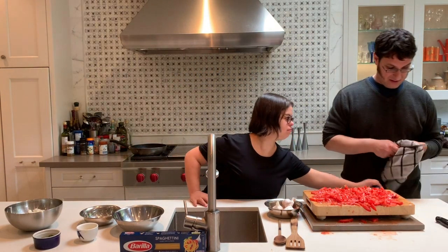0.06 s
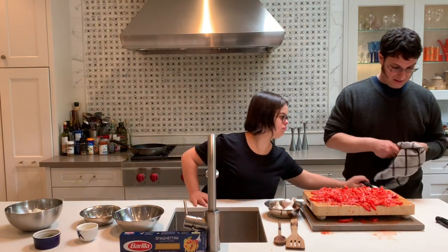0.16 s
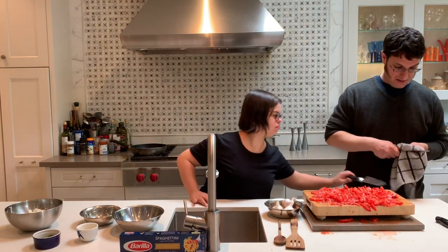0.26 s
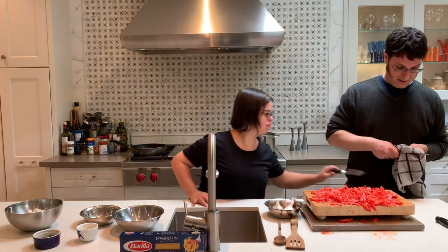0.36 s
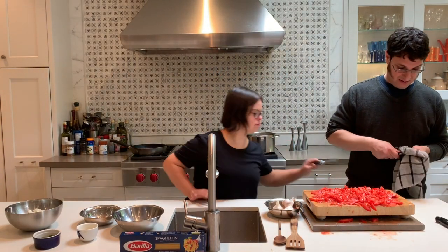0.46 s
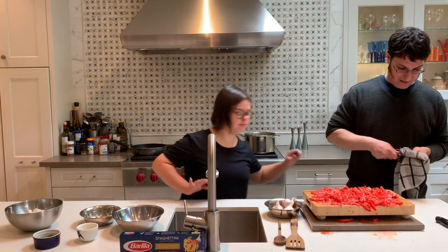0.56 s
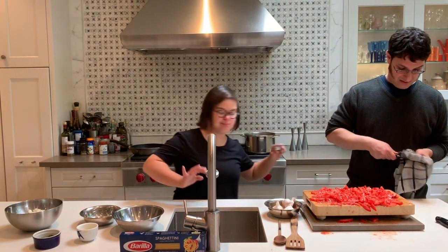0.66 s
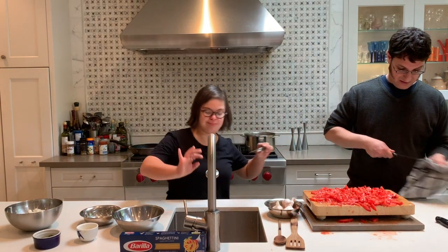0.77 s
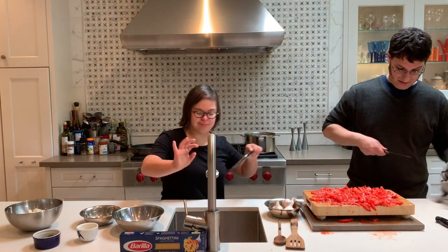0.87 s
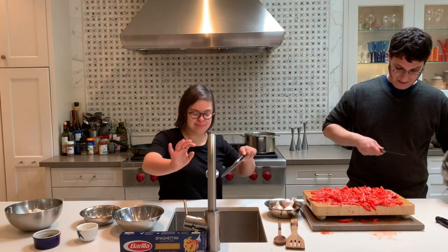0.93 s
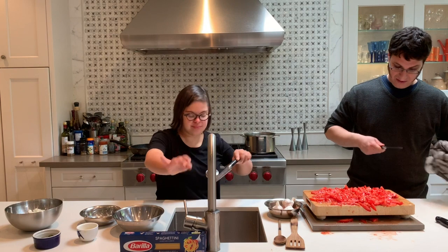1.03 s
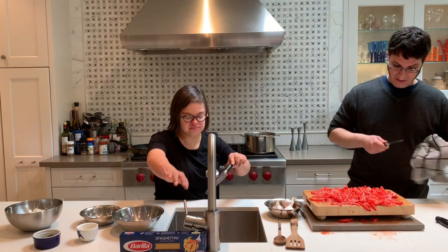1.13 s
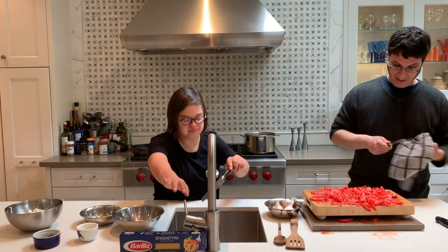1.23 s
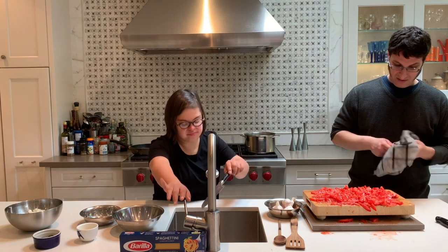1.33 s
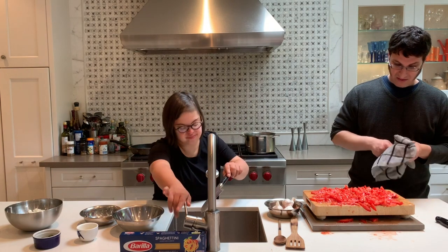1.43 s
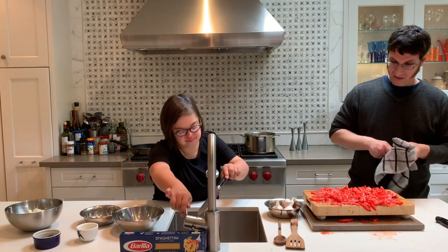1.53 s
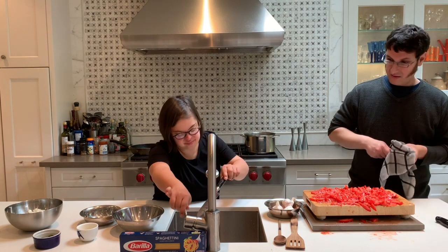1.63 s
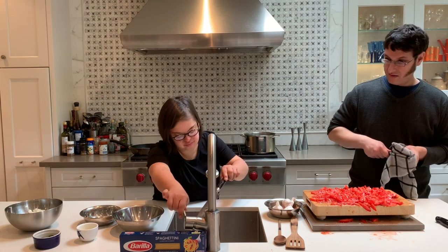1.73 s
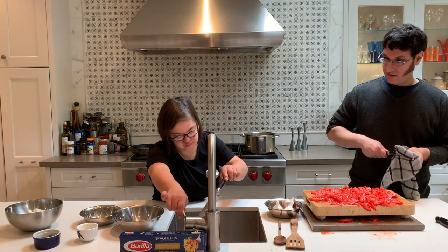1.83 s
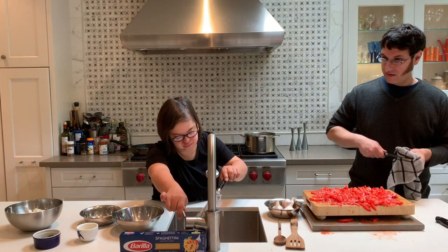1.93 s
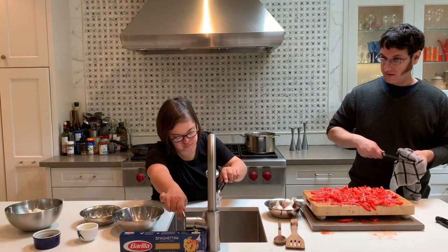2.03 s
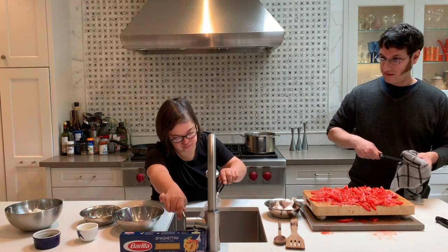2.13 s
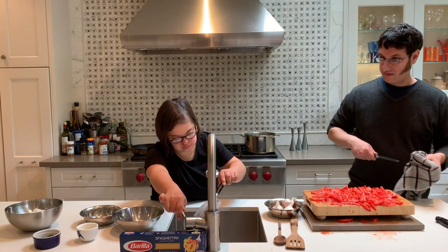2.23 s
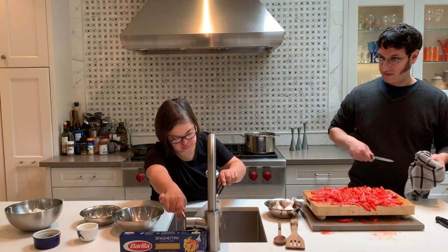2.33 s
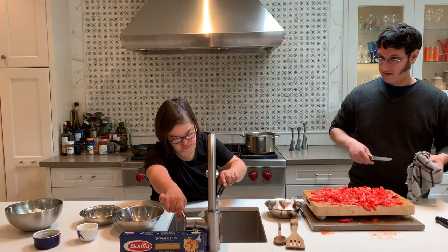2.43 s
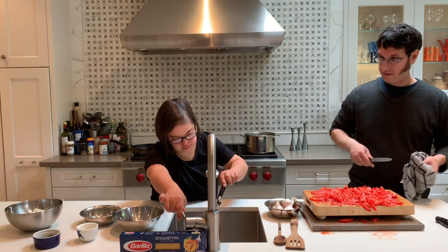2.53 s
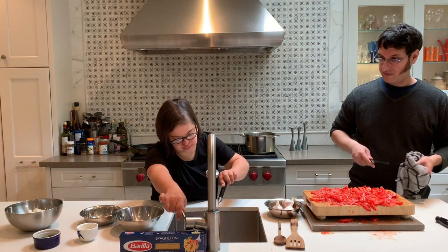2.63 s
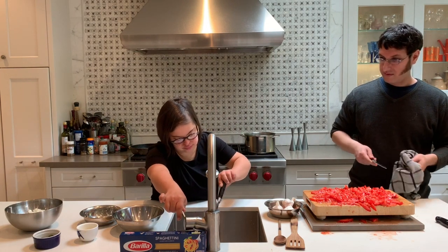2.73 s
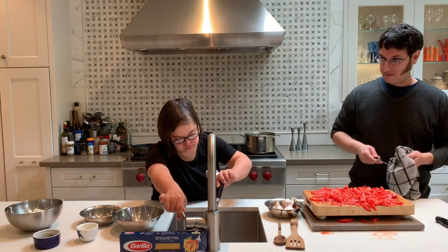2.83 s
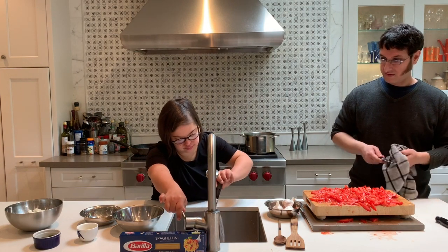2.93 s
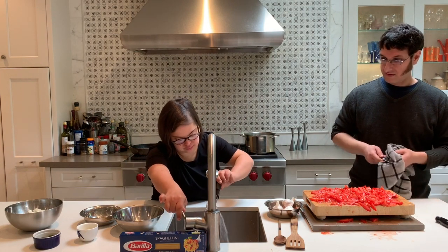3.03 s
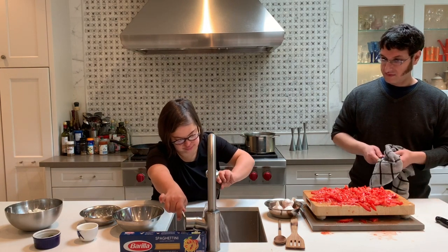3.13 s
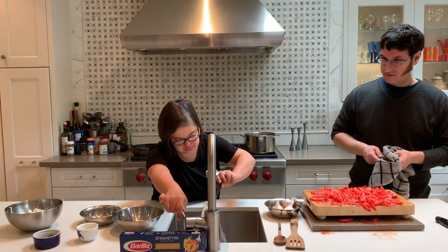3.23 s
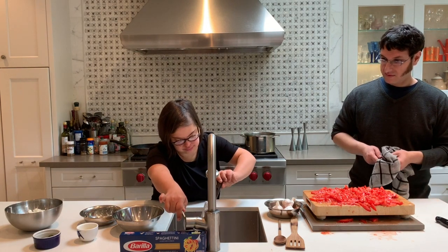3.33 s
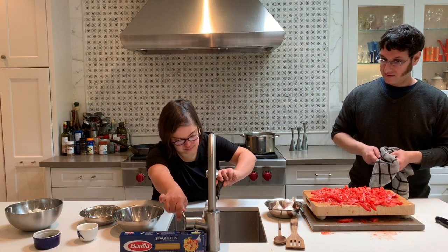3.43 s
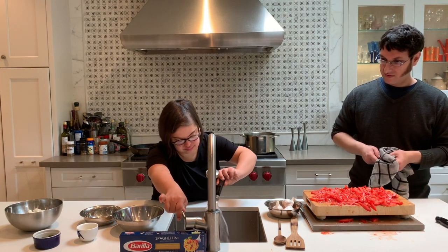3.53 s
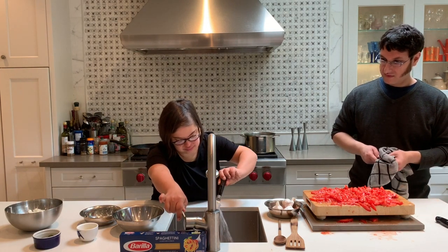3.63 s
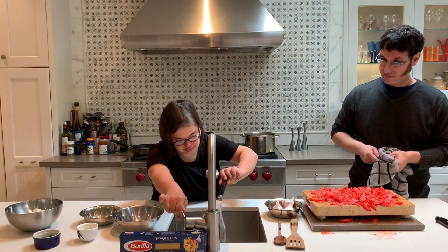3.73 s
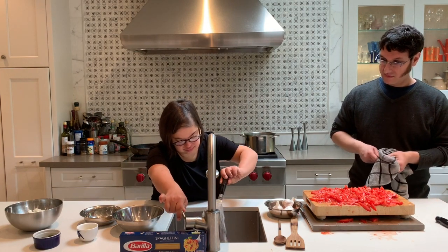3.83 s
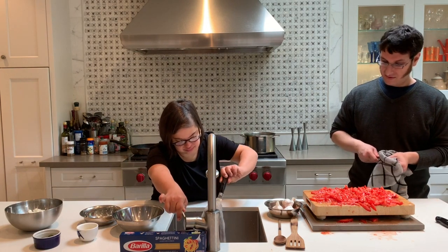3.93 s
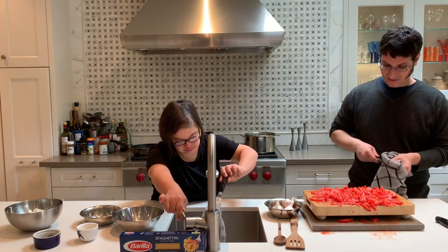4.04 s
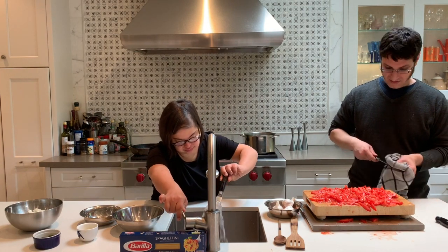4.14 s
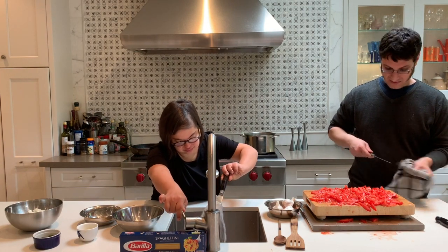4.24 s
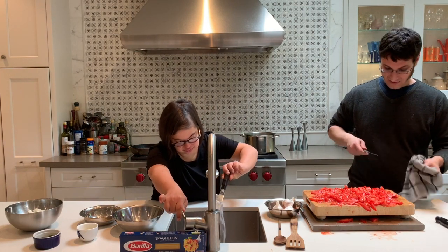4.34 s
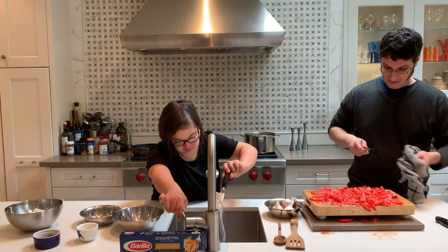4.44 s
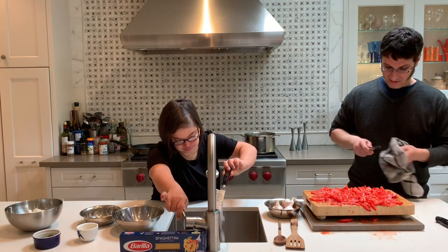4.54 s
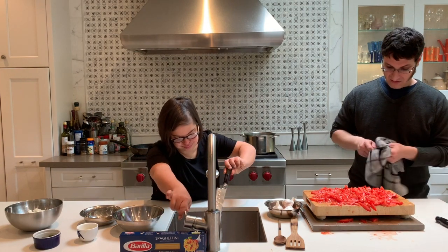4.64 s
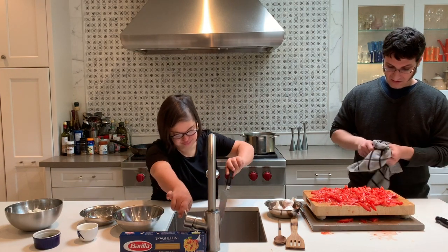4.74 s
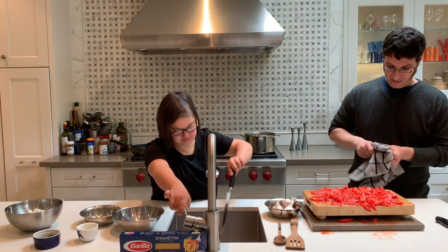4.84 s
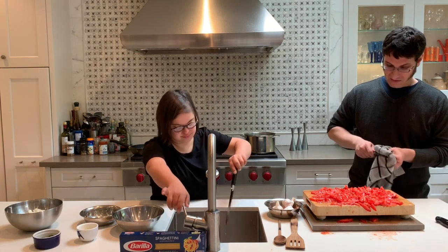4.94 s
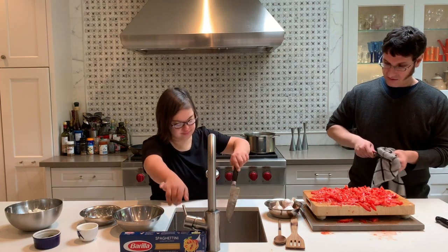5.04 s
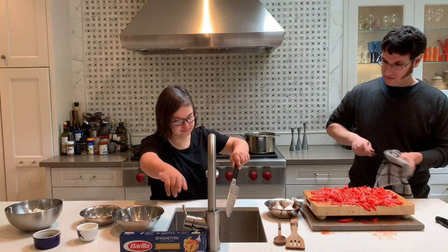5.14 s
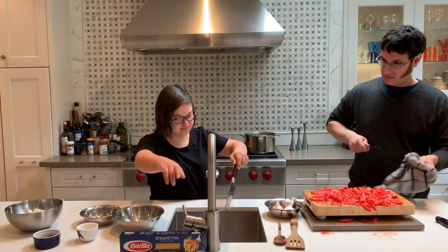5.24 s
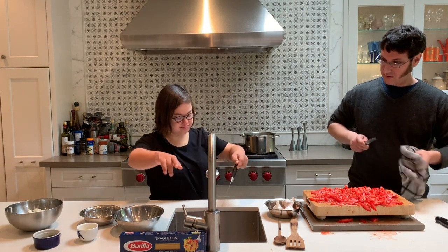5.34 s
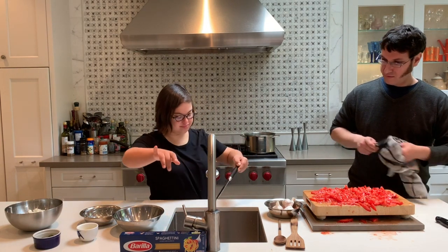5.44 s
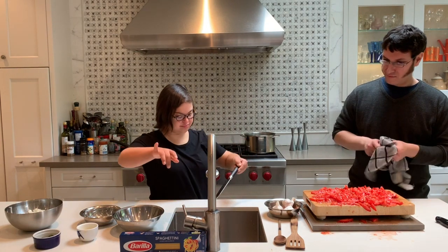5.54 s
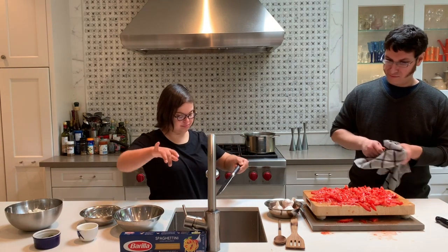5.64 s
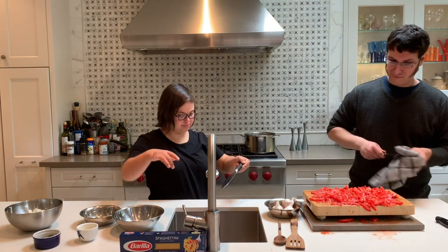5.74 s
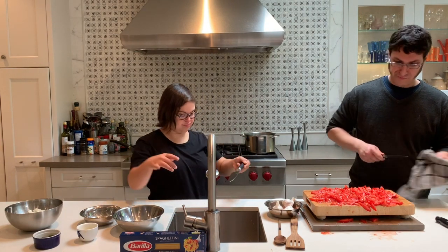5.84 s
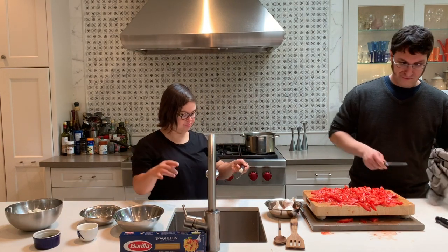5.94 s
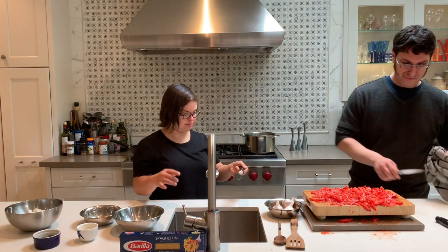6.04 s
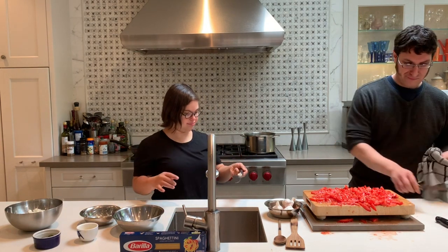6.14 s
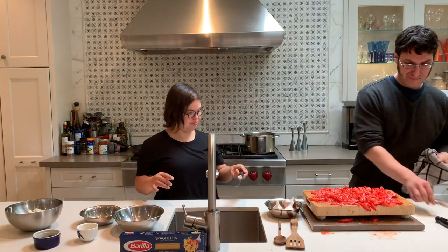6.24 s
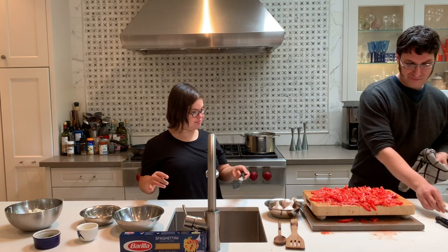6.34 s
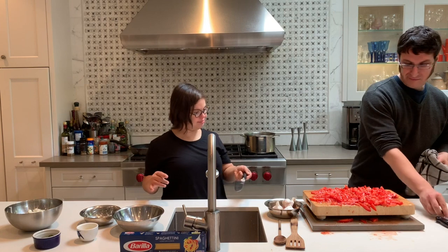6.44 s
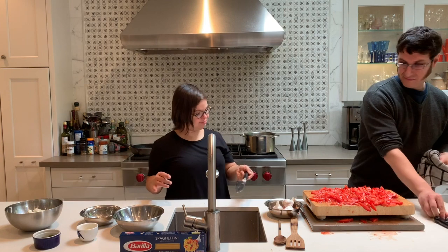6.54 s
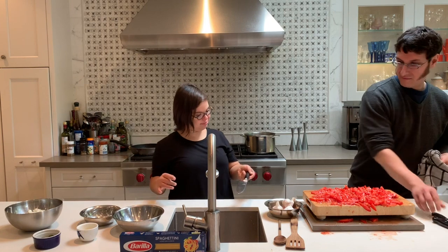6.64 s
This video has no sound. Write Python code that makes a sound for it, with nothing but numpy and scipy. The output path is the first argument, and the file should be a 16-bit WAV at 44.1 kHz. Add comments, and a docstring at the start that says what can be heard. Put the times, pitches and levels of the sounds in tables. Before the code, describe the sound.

Close stereo pickup of kitchen work over quiet ventilation rumble: a dry board clack, faint fabric rubbing, then water spraying from a faucet into a metal basin for about three seconds, with bubbly plinks and low sink booms. Bright pings come before the flow dwindles. After a near-quiet pause with cloth rustle, a knife tip strikes the stone counter, bounces, and its handle knocks and rattles, echoing briefly off tiles.

```python
"""The last rattle of cutlery dies away over a quiet rumble, then a board clacks in a tiled kitchen and cloth swishes.
A tap opens a little, then fully, over a steel sink and shuts again; drips ping, and a knife drops on the stone
counter: tip, bounce, handle. Struck things are sums of fading notes; water, cloth and air are shaped noise;
single bubbles are short rising notes. Tile echoes are added, and two close microphone ports pick it all up."""
import sys
import numpy as np
from scipy import signal
from scipy.fft import rfft, irfft, next_fast_len
from scipy.io import wavfile
from scipy.ndimage import uniform_filter1d

SR = 44100
rng = np.random.default_rng(int(sys.argv[2]) if len(sys.argv) > 2 else 0)


def master_out(mix):
    """Clip the mix to full scale and print it as 16-bit PCM to the path in sys.argv[1]."""
    frames = np.transpose(np.atleast_2d(mix))
    ceiling = np.clip(frames, -1, 1)
    pcm = np.round(ceiling * 32767).astype(np.int16)
    wavfile.write(sys.argv[1], SR, pcm)


N = 295029
LEAD = SR // 5  # samples rendered before time zero, for sounds already ringing

# Levels in the tables are relative: the mix adds its own gains.
# background air: spectrum [f/Hz, level/dB per Hz]
AIR_SPECTRUM = [(30, -4.5), (60, 2), (100, -1), (140, 4), (200, -1.5), (330, -6), (405, 3), (520, -17),
                (800, -20), (1300, -29.5), (2500, -33.5), (6000, -37.5), (9000, -36.5), (15000, -37.5)]
# background air: how alike left and right are [f/Hz, likeness 0 to 1]
AIR_LIKENESS = [(60, 0.94), (380, 0.88), (700, 0.15), (1300, .05)]
AIR_DB = -60.5  # rms level of the air noise

# cutlery rattling just before the start: strength of its notes [f/Hz, level/dB]
CUTLERY_STRENGTH = [(300, -13.5), (800, -6), (1200, -9), (2000, -8.5), (3450, -1.5), (4500, -5), (7000, 5),
                    (8500, 23), (11500, 27), (15000, -1)]
CLINK_S, CLINK_DB = -0.098, -41
# clack: contacts with the board [t/s, level/dB]
CLACK_HITS = [(.1305, -34.5), (.1365, -34.5), (.146, -42.5), (0.157, -42.5)]
# clack: strength of the board's many close, short notes [f/Hz, level/dB]
BOARD_STRENGTH = [(100, -49.5), (160, -25.5), (300, -28.5), (550, -21), (800, -0.5), (1200, 3.5),
                  (2000, 9.5), (2500, 5.5), (3200, 1.5), (4300, -6), (4800, -31.5), (5400, -9.5),
                  (7000, -15), (8000, -52.5), (16000, -49)]
# clack: single rings of the board [f/Hz, level/dB, time to fall 60 dB/s]
BOARD_NOTES = [(867, -7, 0.1), (1410, -2, .12), (1857, -3.5, 0.22), (2150, 3, 0.078), (2730, -7.5, 0.12),
               (5420, -31.5, .15), (6770, -23.5, 0.16), (6960, -25.5, 0.2), (11400, -28.5, 0.048),
               (13300, -31.5, .04)]
# knife: contacts with the counter [t/s, blade level/dB, handle level/dB]
KNIFE_HITS = [(6.4019, -25, -37.5), (6.4138, -27.5, -59), (6.46, -25.5, -38.5), (6.493, -26, -44),
              (6.5122, -33, -19.5), (6.515, -19.5, -14.5), (6.528, -42, -33), (6.544, -21.5, -43),
              (6.557, -43, -27.5), (6.581, -42, -27.5), (6.595, -43, -27.5), (6.611, -51, -28.5),
              (6.618, -29, -32)]
# knife: rings of the blade [f/Hz, level/dB, time to fall 60 dB/s]
BLADE_NOTES = [(815, 3, 0.019), (2090, -7, 0.036), (4380, -9, 0.075), (4520, -5.5, 0.039),
               (5580, -9, 0.025), (5857, -2.5, 0.041), (8000, -20, 0.028), (8300, -5, 0.046),
               (8460, -6.5, 0.13), (11400, -3, 0.021), (10960, 4, 0.029), (11900, -14, 0.022),
               (12700, -19, .02), (13200, -3, 0.022), (14500, -15, .015), (16200, -12, .015)]
# knife: strength of the many short notes of handle and counter [f/Hz, level/dB]
HANDLE_STRENGTH = [(180, -16), (270, -13), (450, -4.5), (600, -4), (800, -4.5), (1200, 9), (2000, 4.5),
                   (2500, 8), (3300, 7.5), (4500, -28), (6500, -26), (16000, -40)]
# knife: longer counter rings under the handle [f/Hz, level/dB, time to fall 60 dB/s]
COUNTER_NOTES = [(269, -6.5, 0.2), (753, -11, 0.047), (1158, -1, 0.12), (1250, -3, .2), (1500, -12, 0.17),
                 (2050, -4, 0.13), (3410, -2.5, 0.045)]

# low thumps through the cabinet [t/s, level/dB, f/Hz]
THUMP_NOTES = [(0.139, -46, 163), (4.719, -40.5, 88), (4.779, -52, 55.3), (6.528, -39.5, 67)]
# drips and plops, one note each [t/s, level/dB, f/Hz]
DRIP_NOTES = [(1.618, -58, 805), (1.783, -46.5, 310), (1.787, -50.5, 920), (1.924, -43.5, 1294),
              (2.324, -33, 2140), (3.608, -44, 990), (4.416, -29, 3150), (4.51, -29.5, 3000),
              (4.546, -29, 3270), (4.587, -39, 1280), (5.702, -58, 1424), (5.935, -58, 765)]
# hollow knocks in the basin [t/s, level/dB, main note f/Hz]
BASIN_KNOCKS = [(2.635, -34, 1424), (4.033, -40, 1260), (4.689, -34, 1032)]
# notes inside each knock [multiple of the main note, level/dB]
KNOCK_PARTS = [(.6, -10.5), (0.999, 1), (1.52, 0), (3, -14)]
# light touch of steel on steel [f/Hz, level/dB, time to fall 60 dB/s]
TING_NOTES = [(1750, -8, 0.034), (2935, 2, 0.032), (4050, -4, 0.016)]
TING_S, TING_DB = 5.982, -58.5
DRIP_CYCLES, KNOCK_CYCLES, THUMP_CYCLES = 38, 26.3, 27  # cycles to fall by 60 dB

# cloth, sleeves, and a long faint hiss of the last trickle
# [t/s, length/s, level/dB, treble loss/dB per octave]
SWISH_HISSES = [(0.638, 0.08, -83, 12), (0.755, 0.16, -79.5, 5), (0.358, 0.87, -100.5, 1.5),
                (5.303, 0.77, -100.5, 0), (5.18, 0.091, -82, 15), (5.34, 0.14, -90.5, 21),
                (5.712, 0.14, -79.5, 14), (5.918, 0.12, -89.5, 21), (6.018, 0.045, -93, 3.5),
                (6.118, 0.14, -78.5, 4.5), (6.223, 0.2, -81.5, 11.5)]

# tap: flow over time [t/s, spray level/dB, lift of larger bubbles/dB]
TAP_FLOW = [(1.66, -87, -0.5), (1.77, -74, 14), (1.81, -52, -1), (2.07, -49, 1), (2.17, -40, -2),
            (2.45, -44, 1.5), (2.57, -42, 0.5), (3.69, -43, -0.5), (3.71, -41.5, -5.5), (3.88, -45, 4.5),
            (4.73, -42.5, 8), (4.93, -49, -10.5), (5.14, -77, -1), (5.5, -86, 5)]
# spray colour of the thinnest jet [f/Hz, level/dB per Hz]
TRICKLE_COLOUR = [(200, -24), (500, -1.5), (1100, -1), (1700, -9.5), (2500, 1.5), (4000, -1), (6000, -2.5),
                  (8300, -3), (10500, -14), (15000, -13)]
# spray colour of the fullest jet [f/Hz, level/dB per Hz]
STREAM_COLOUR = [(200, 5.5), (500, -8), (800, -20), (1700, -10), (2500, -4.5), (4000, -1), (6000, -1.5),
                 (8300, -2), (10500, -8.5), (15000, -15)]
# spray: how alike left and right are [f/Hz, likeness 0 to 1]
SPRAY_LIKENESS = [(200, 0.83), (500, 0.62), (1200, 0.45), (2700, 0.39), (5000, 0.16)]
# spray: side balance [f/Hz, left minus right/dB]
SPRAY_BALANCE = [(300, 1), (800, 4), (1800, 3.5), (4200, -.5), (6400, -2.5), (10000, 19)]
TRICKLE_DB, STREAM_DB = -55.5, -35  # spray levels at which the jet is thinnest and fullest
GURGLE_HZ = 1250  # centre of the lift from larger bubbles
BUBBLES_PER_S, BUBBLE_DB = 110, -3.5  # average rate of single bubbles, offset from the spray level

# water drumming on the sink bottom [t/s, level/dB]
DRUM_LEVEL = [(2.05, -69), (2.19, -45), (2.42, -51.5), (2.49, -44.5), (2.54, -53.5), (2.74, -42.5),
              (2.9, -61.5), (3.0, -48), (3.25, -47.5), (3.35, -37), (3.46, -54.5), (3.61, -42), (3.65, -50),
              (3.86, -49), (4.49, -57.5), (4.56, -46.5), (4.72, -46), (5.05, -63)]
# low notes of the steel sink [f/Hz, width/Hz, level/dB]
SINK_MODES = [(87, 6.4, -12), (161, 4.7, 1.5), (199.2, 7.5, 5.5), (257, 11, -34), (411, 49, -22),
              (468.5, 13, -22.5)]
# a first slug of water and the last ones, falling on the sink bottom [t/s, level/dB]
SLUG_HITS = [(1.76, -65), (5.17, -57), (5.339, -50), (5.63, -61.5), (5.73, -60.5), (5.94, -53.5),
             (6.08, -56), (6.29, -53.5)]
SLUG_RISE_S, SLUG_T60_S = 0.005, 0.7  # swell, and time to fall 60 dB

# tile echoes: fading time before a further treble loss [f/Hz, time to fall 60 dB/s]
ECHO_T60 = [(250, 0.27), (660, 0.54), (1740, 0.54), (4590, 0.59), (10000, 0.23)]
PORT_LAG_S, PORT_FROM_HZ, PORT_SAME = 0.0002592, 6600, 1  # shared treble reaches the right port first
EDGE_HZ = 15800  # upper band limit


def gain_of(db):
    """Turns decibels into a gain."""
    return 10 ** (np.asarray(db) / 20)


def evened(x):
    """Scales a signal to rms 1."""
    return x / np.sqrt(np.mean(x ** 2) + 1e-20)


def read(points, hz):
    """Reads a table between its points, along a log-frequency axis."""
    f, value = np.transpose(points)
    return np.interp(np.log(hz + 1), np.log(f + 1), value)


def add(mix, s, sound):
    """Adds a sound at a time in seconds."""
    part = mix[LEAD + round(s * SR):][:len(sound)]
    part += sound[:len(part)]


def grid(size):
    """Gives the frequencies and frame times of a short-time spectrum."""
    times = np.arange(N // (size // 4) + 5) * (size // 4) / SR
    return np.fft.rfftfreq(size, 1 / SR), times


def noise(field_db, same, size):
    """Makes two-channel noise from levels over frequency and time, left and right as alike as asked."""
    a, b, c, d = rng.standard_normal((field_db.shape[-1], size // 2 + 1, 4)).T
    same = np.clip(same, -1, 1)[:, None]
    left = a + 1j * b
    right = same * left + np.sqrt(1 - same ** 2) * (c + 1j * d)
    z = np.array([left, right]) * gain_of(field_db)
    return signal.istft(z, nperseg=size, noverlap=size * 3 // 4)[1][:, :N]


def patches(hz, t, bins, frames):
    """Makes random blotches over frequency and time, rms 1."""
    z = rng.standard_normal((len(t), len(hz))).T
    z = uniform_filter1d(z, round(bins), 0)
    return evened(uniform_filter1d(z, round(frames), 1))


def ring(modes, rise_s):
    """One blow sets notes ringing; each blow lands at a slightly different spot and takes a moment."""
    t = np.arange(SR // 3) / SR
    hz, db, t60 = np.transpose(modes)[:, :, None]
    side = rng.choice([-1., 1.], hz.shape)  # either side of a still point
    spot = gain_of(2. * rng.standard_normal(hz.shape)) * side
    notes = spot * gain_of(db - 60 * t / t60) * np.sin(2 * np.pi * hz * t)
    return notes.sum(0) * (1 - np.exp(-t / rise_s)) / 3


def crowd(strength, cycles, count=80):
    """Spreads many close notes unevenly over a table's span; each falls 60 dB in so many cycles."""
    low, high = np.log(strength[0][0]), np.log(strength[-1][0])
    place = (np.arange(count) + rng.random(count)) / count
    hz = np.exp(low + (high - low) * place)
    t60 = np.minimum(cycles / hz, .07)  # never longer than 70 ms
    return np.transpose([hz, read(strength, hz), t60])


def air():
    """Fridge and ventilation: noise with a lumpy low rumble over faint hiss."""
    hz, t = grid(1024)
    lumps_db = 2.6 * patches(hz, t, 8, 12) * (hz < 900)[:, None]
    field_db = read(AIR_SPECTRUM, hz)[:, None] + lumps_db
    return gain_of(AIR_DB) * evened(noise(field_db, read(AIR_LIKENESS, hz), size=1024))


def blows():
    """Cutlery, board and knife: each contact sets fading notes ringing; the blade also scrapes."""
    out, t = np.zeros(N + LEAD), np.arange(SR // 10) / SR
    add(out, CLINK_S, gain_of(CLINK_DB) * ring(crowd(CUTLERY_STRENGTH, 130), 0.0002))
    for s, db in CLACK_HITS:
        board = ring(crowd(BOARD_STRENGTH, 48), 0.0005) + ring(BOARD_NOTES, 0.00095)
        add(out, s, gain_of(db) * board)
    for s, blade_db, handle_db in KNIFE_HITS:
        hiss = signal.lfilter([1, 0, -1], [1], rng.standard_normal(len(t)))
        scrape = hiss * gain_of(-5.5 - 60 * t / 0.03) * (1 - np.exp(-t / 0.00078))
        add(out, s, gain_of(blade_db) * scrape)
        add(out, s, gain_of(blade_db) * ring(BLADE_NOTES, 0.00086))
        handle = ring(crowd(HANDLE_STRENGTH, 8.8), 0.00018)
        counter = gain_of(-6.0) * ring(COUNTER_NOTES, 0.00041)
        add(out, s, gain_of(handle_db) * (handle + counter))
    # little bass lies under the blows
    return signal.sosfilt(signal.butter(2, 170, "high", fs=SR, output="sos"), out)


def pings():
    """Each thump, drip, knock or ting rings short notes over a small splash of nearby notes."""
    out, t = np.zeros(N + LEAD), np.arange(SR // 3) / SR
    notes = [(s, db, hz, DRIP_CYCLES / hz) for s, db, hz in DRIP_NOTES]
    for s, db, hz in BASIN_KNOCKS:
        notes += [(s, db + part_db, hz * k, KNOCK_CYCLES / (hz * k)) for k, part_db in KNOCK_PARTS]
    notes += [(s, db, hz, THUMP_CYCLES / hz) for s, db, hz in THUMP_NOTES]
    notes += [(TING_S, TING_DB + db, hz, t60) for hz, db, t60 in TING_NOTES]
    for s, db, hz, t60 in notes:
        rise = 1 - np.exp(-t * hz / 0.71)  # swells over about a cycle
        tone = gain_of(-60 * t / t60) * np.sin(2 * np.pi * hz * t) * rise
        splash = gain_of(-2.0) * ring([(hz * k, 0, 9 / hz) for k in (.75, 1.3, 1.7)], 0.00058)
        add(out, s, gain_of(db) * (tone + splash))
    return out


def swishes():
    """Fabric rubbing, and the last trickle's long faint hiss: noise that swells quickly and fades."""
    hz, t = grid(512)
    power = np.full((len(hz), len(t)), 1e-20)
    for s, length, db, dull_db in SWISH_HISSES:
        u = np.clip((t - s) / length, 0, 1)
        shape = np.sqrt(u) * (1 - u) * 2.47
        octaves = np.log2(np.maximum(hz, 500) / 1000)  # counted from 1 kHz
        power += (gain_of(db - dull_db * octaves)[:, None] * shape) ** 2
    field_db = 10 * np.log10(power) + 2.6 * patches(hz, t, 8, 6)
    return noise(field_db, .5 + 0 * hz, size=512)


def spray():
    """Bursting bubbles and splashes: hiss with blotches and sharp flickers, its colour following the flow."""
    hz, t = grid(256)
    s, level_db, gurgle_db = np.transpose(TAP_FLOW)
    full = np.clip((np.interp(t, s, level_db) - TRICKLE_DB) / (STREAM_DB - TRICKLE_DB), 0, 1)
    trickle_db, stream_db = read(TRICKLE_COLOUR, hz)[:, None], read(STREAM_COLOUR, hz)[:, None]
    colour_db = trickle_db * (1 - full) + stream_db * full
    band = (hz > 2000) & (hz < 8500)  # keep this band's power equal for every colour
    colour_db -= 10 * np.log10((gain_of(colour_db[band]) ** 2).sum(0))
    gurgle_shape = np.exp(-np.log((hz + 1) / GURGLE_HZ) ** 2 / .12)[:, None]
    colour_db += gurgle_shape * np.interp(t, s, gurgle_db)
    bursts = rng.random(len(t)) * (rng.random(len(t)) < .04)
    splash = signal.lfilter([1], [1, -.6], bursts)  # sudden, dying in a few ms
    texture_db = 1.73 * patches(hz, t, 6, 50) + 2.0 * patches(hz, t, 3, 6)
    texture_db += 4.7 * splash * (hz / 10000)[:, None]  # strongest in the treble
    pan_db = np.array([.5, -.5])[:, None, None] * read(SPRAY_BALANCE, hz)[:, None]
    level_db = np.interp(t, s, level_db, left=-120, right=-120)
    field_db = colour_db + texture_db + pan_db + level_db
    return 1.062 * noise(field_db, read(SPRAY_LIKENESS, hz), size=256)


def bubbles():
    """Single bubbles in the basin: short notes that rise a little, a few of them loud."""
    s, level_db = np.transpose(TAP_FLOW)[:2]
    span = s[-1] - s[0]
    out = np.zeros((2, N + LEAD))
    for when, pitch, size, side in rng.random((round(BUBBLES_PER_S * span), 4)):
        when, hz = s[0] + when * span, 1100 * 5. ** pitch
        u = np.arange(round(30 * SR / hz)) / SR * hz  # time in starting cycles
        tone = np.sin(2 * np.pi * u * (1 + .0015 * u))
        note = tone * (1 - np.exp(-u / 4.7)) * np.exp(-u / 7.4)
        db = np.interp(when, s, level_db) + BUBBLE_DB + 7. * (pitch - 1)
        db -= 2.6 * np.log(size + 0.022)  # only draws near zero are loud
        add(out[0], when, gain_of(db + 4.1 * (side - 1.5)) * note)
        add(out[1], when, gain_of(db - 2.7 * (side + 2.0)) * note)
    return out


def drum():
    """Slugs of water beat the steel bottom: noise rings the sink's low notes."""
    slugs = rng.standard_normal(N)
    out = np.zeros(N)
    for hz, width, db in SINK_MODES:
        r = np.exp(-np.pi * width / SR)
        resonance = [1, -2 * r * np.cos(2 * np.pi * hz / SR), r * r]
        out += gain_of(db) * evened(signal.lfilter([1, 0, -1], resonance, slugs))
    out = signal.sosfilt(signal.butter(2, 650, fs=SR, output="sos"), out)  # the drumming holds nothing above about 650 Hz
    strength = uniform_filter1d(uniform_filter1d(out ** 2, 1200), 1200)
    steady = out / strength ** 0.2  # partly evens out the random swells
    s, level_db = np.transpose(DRUM_LEVEL)
    t = np.arange(N) / SR
    power = gain_of(np.interp(t, s, level_db, left=-120, right=-120)) ** 2
    for s, db in SLUG_HITS:
        age = np.maximum(t - s, 0)
        power += (gain_of(db - 60 * age / SLUG_T60_S) * np.minimum(age / SLUG_RISE_S, 1)) ** 2
    return evened(steady) * np.sqrt(power)


def kitchen(x):
    """Tile echoes: one of random sign in every 20 samples, each band dying at its own speed."""
    taps = np.zeros((2, SR))
    at = np.arange(120, SR - 40, 20)
    at = at + rng.integers(0, 20, (2, len(at)))
    np.put_along_axis(taps, at, rng.choice([-1., 1.], at.shape), 1)
    hz, t, z = signal.stft(taps, SR, nperseg=256)
    alike = np.clip(1.3 - hz / 800, .1, .98)[:, None]  # long waves are alike at both ports
    z[1] = alike * z[0] + np.sqrt(1 - alike ** 2) * z[1]
    fade_db = -60 * t / read(ECHO_T60, hz)[:, None] - 0.17 * hz[:, None] / 1000
    tail = signal.istft(z * gain_of(fade_db), SR, nperseg=256)[1]
    return signal.fftconvolve(x[None], tail / np.linalg.norm(tail[0]), axes=1)[:, :len(x)]


def scene():
    """Mixes all sources; blows are sent to the echo most strongly, the nearer drips less."""
    hit, drip, bubble = blows(), pings(), bubbles()
    water = np.pad(spray(), [(0, 0), (LEAD, 0)])
    direct = gain_of(4.5) * np.array([hit, np.roll(hit, 3)])  # the right port 3 samples later
    to_echo = gain_of(3.5) * hit + gain_of(-0.5) * drip
    to_echo += gain_of(-8.0) * bubble.mean(0) + gain_of(-6.5) * water.mean(0)
    echoed = direct + drip + bubble + water + kitchen(to_echo)
    return echoed[:, LEAD:] + air() + drum() + swishes()


def record(dry):
    """In the treble both ports hear nearly one wave, the left a moment later; then the band limit."""
    size = next_fast_len(N + 2048)
    hz, (left, right) = np.fft.rfftfreq(size, 1 / SR), rfft(dry, size)
    same = np.clip(PORT_SAME, 0, 1) / (1 + np.exp((PORT_FROM_HZ - hz) / 400))
    earlier = left * np.exp(2j * np.pi * hz * PORT_LAG_S)
    right = same * earlier + np.sqrt(1 - same ** 2) * right
    ports = irfft(np.array([left, right]), size)[:, :N]
    band_limit = signal.firwin(511, EDGE_HZ, window=("kaiser", 9), fs=SR)
    return signal.oaconvolve(ports, band_limit[None], "same")


dry = scene()
out = record(dry)
master_out(out)
```